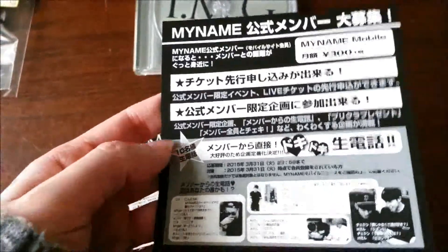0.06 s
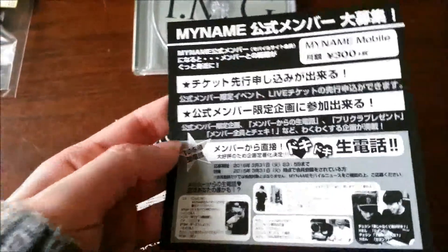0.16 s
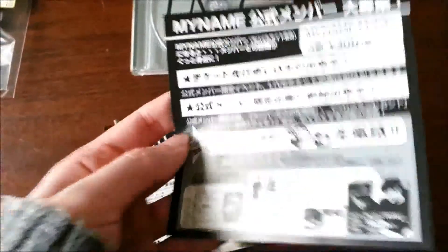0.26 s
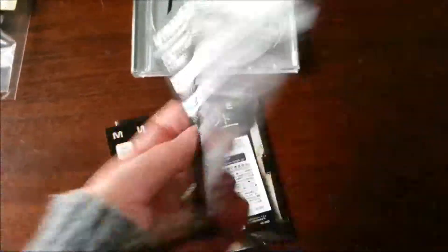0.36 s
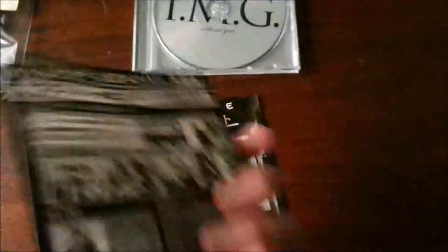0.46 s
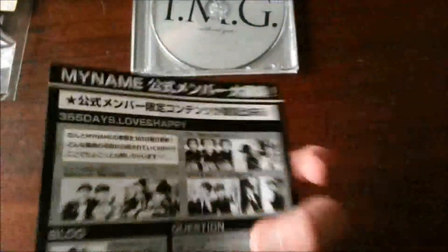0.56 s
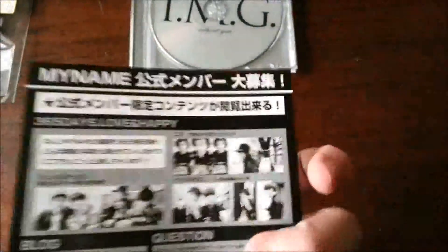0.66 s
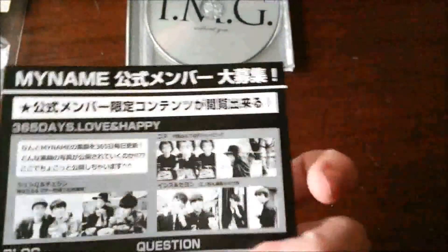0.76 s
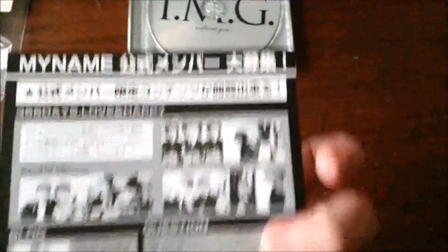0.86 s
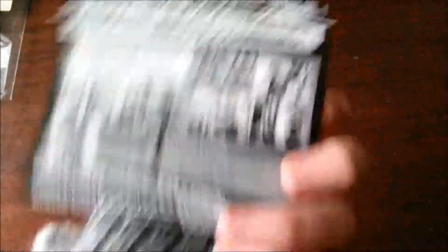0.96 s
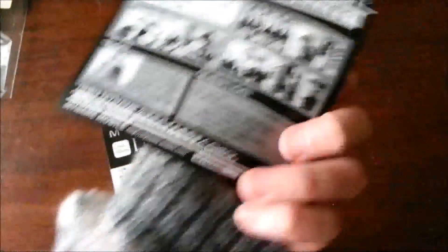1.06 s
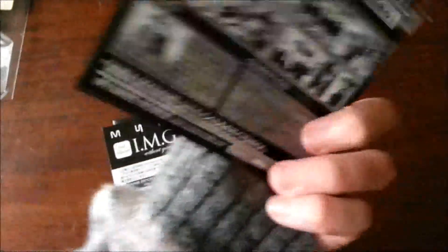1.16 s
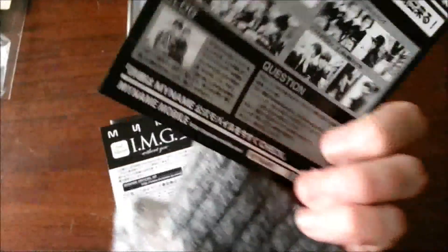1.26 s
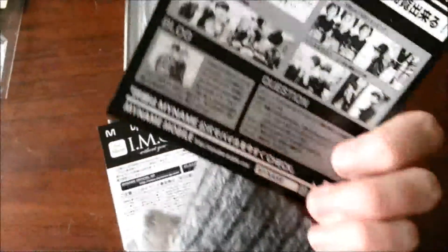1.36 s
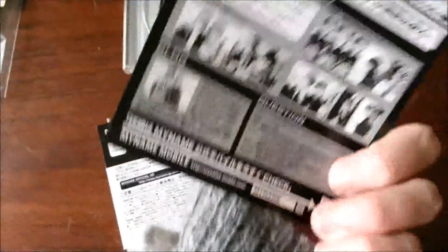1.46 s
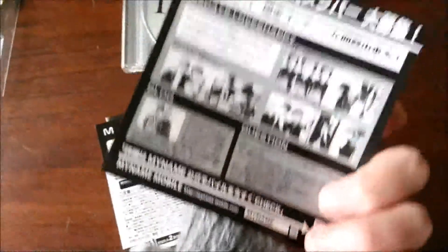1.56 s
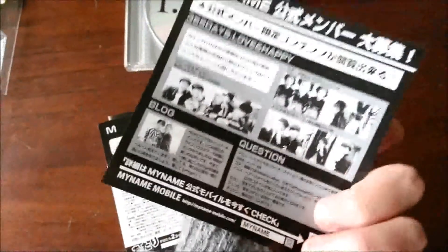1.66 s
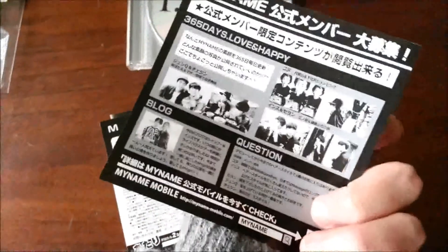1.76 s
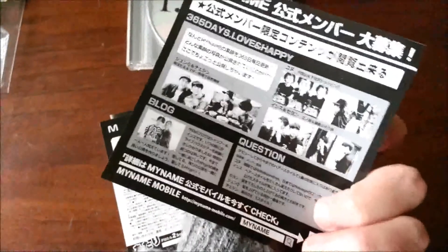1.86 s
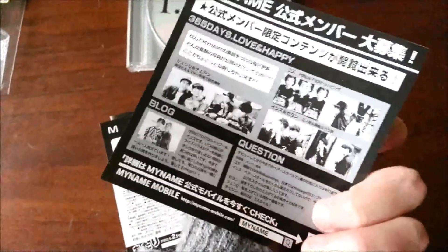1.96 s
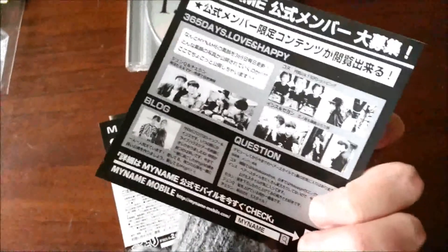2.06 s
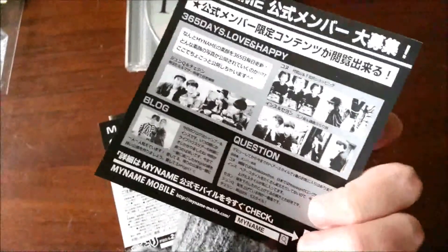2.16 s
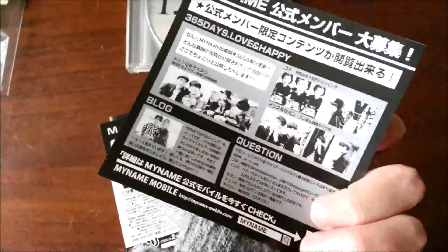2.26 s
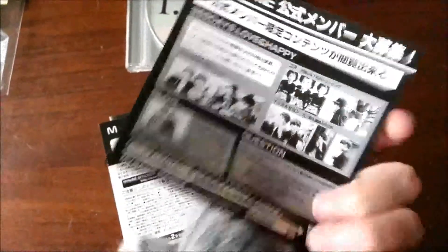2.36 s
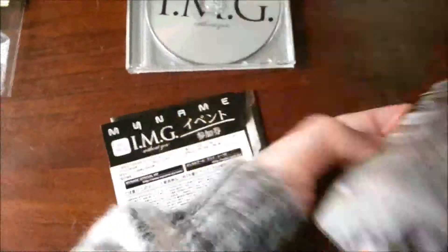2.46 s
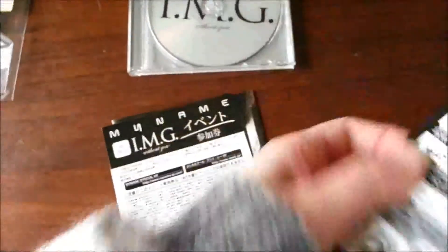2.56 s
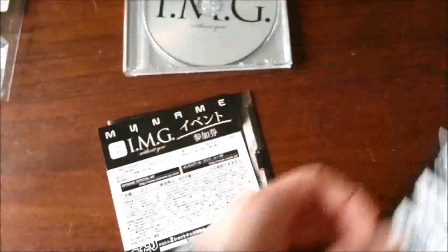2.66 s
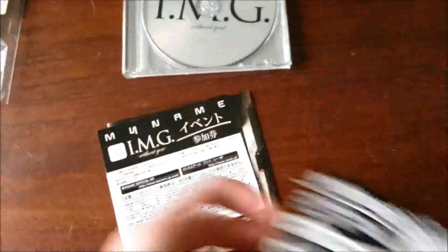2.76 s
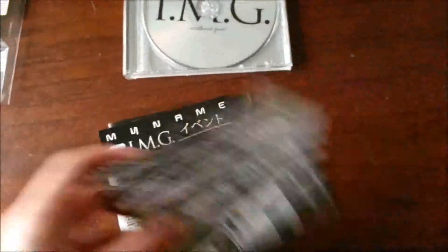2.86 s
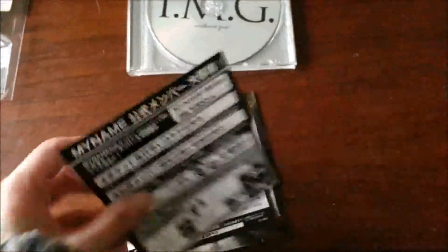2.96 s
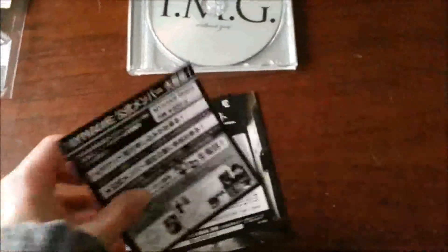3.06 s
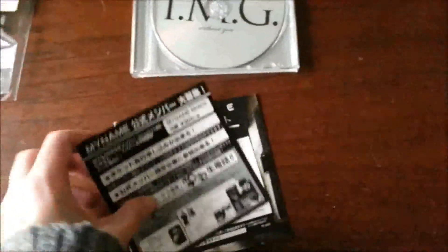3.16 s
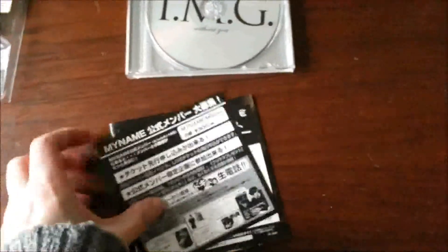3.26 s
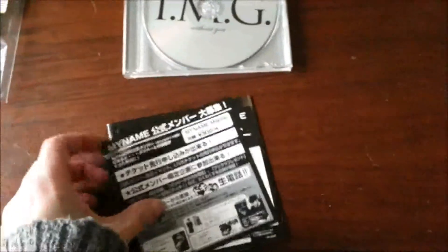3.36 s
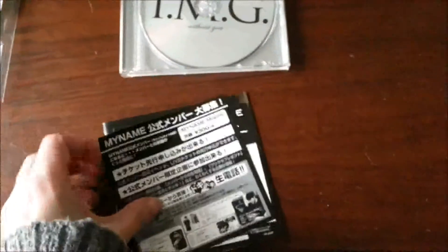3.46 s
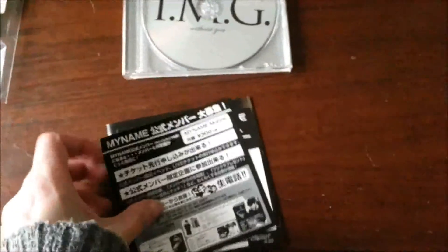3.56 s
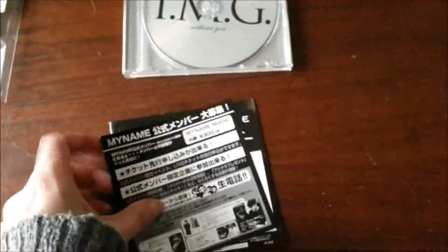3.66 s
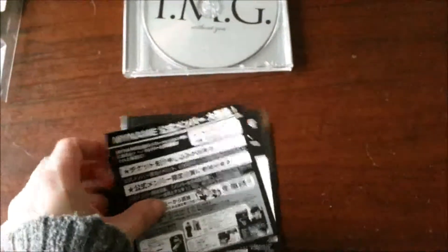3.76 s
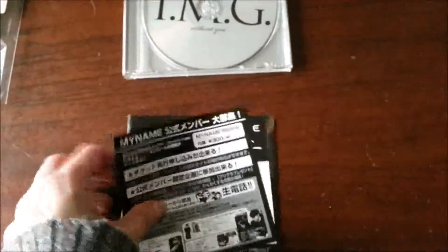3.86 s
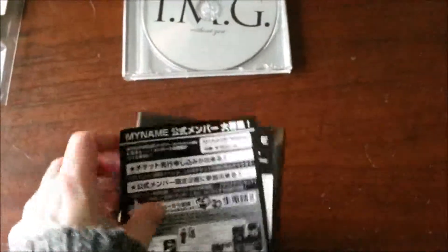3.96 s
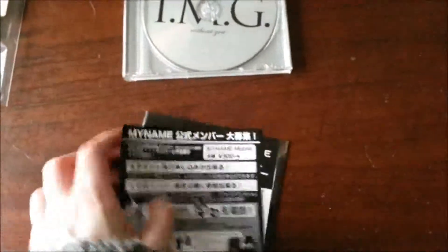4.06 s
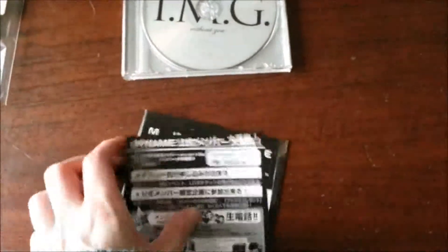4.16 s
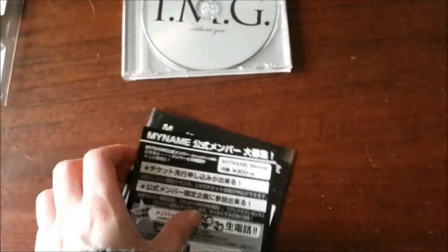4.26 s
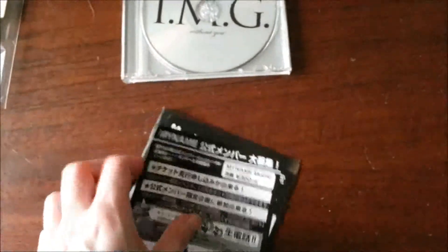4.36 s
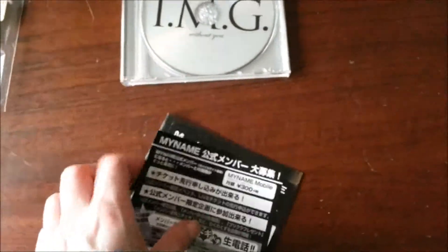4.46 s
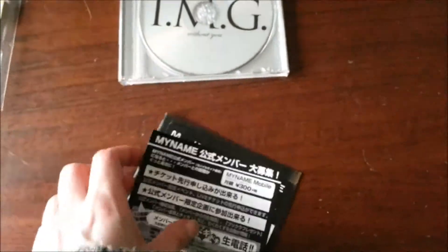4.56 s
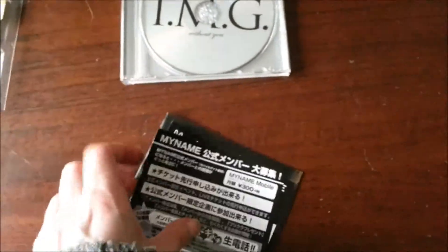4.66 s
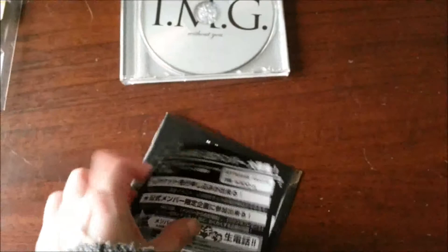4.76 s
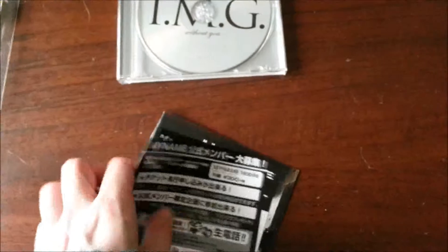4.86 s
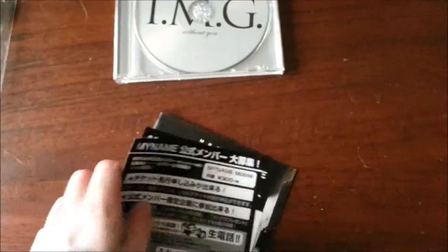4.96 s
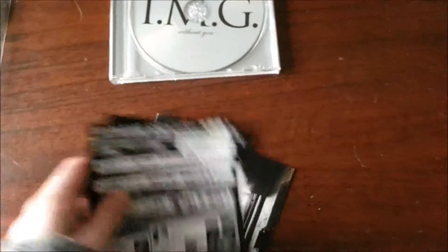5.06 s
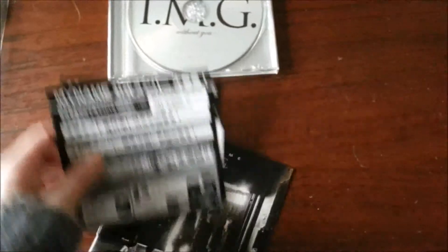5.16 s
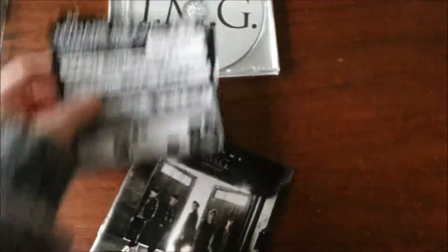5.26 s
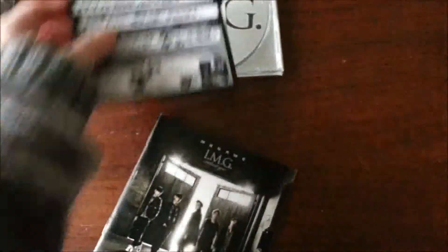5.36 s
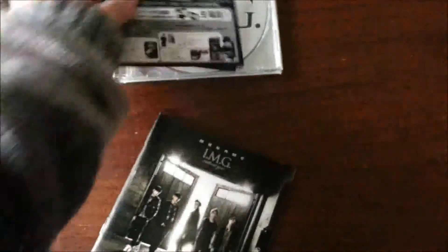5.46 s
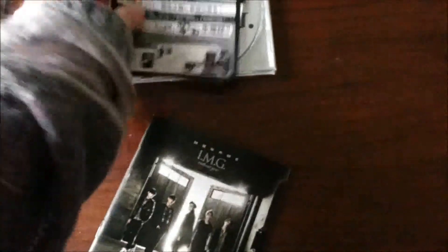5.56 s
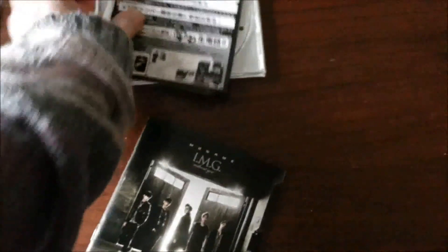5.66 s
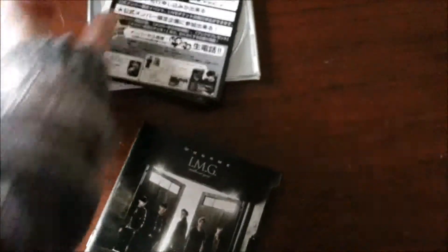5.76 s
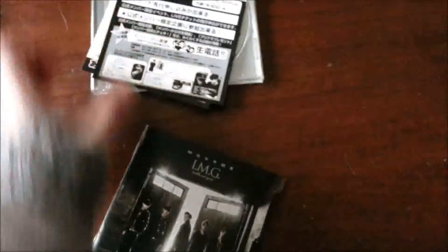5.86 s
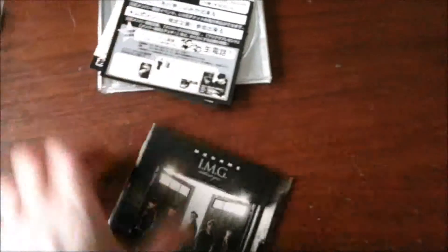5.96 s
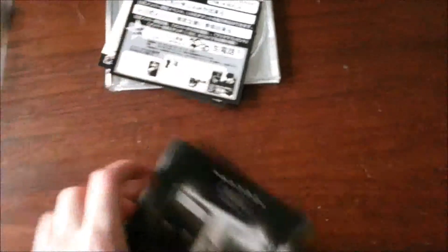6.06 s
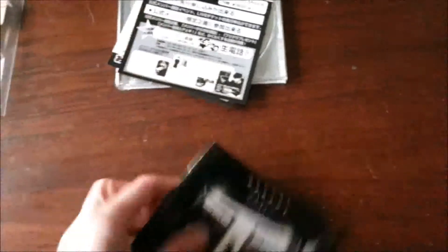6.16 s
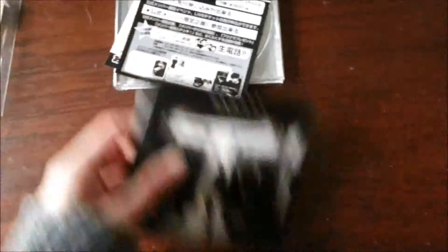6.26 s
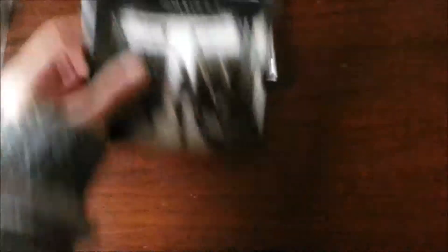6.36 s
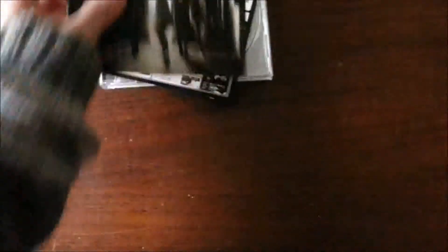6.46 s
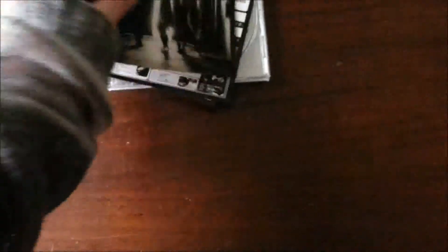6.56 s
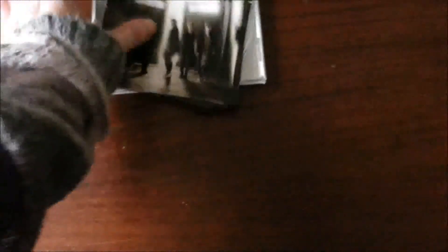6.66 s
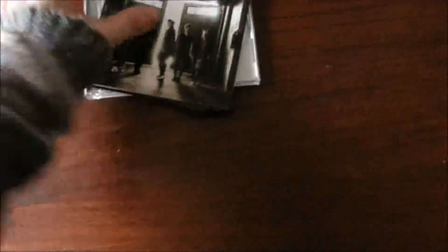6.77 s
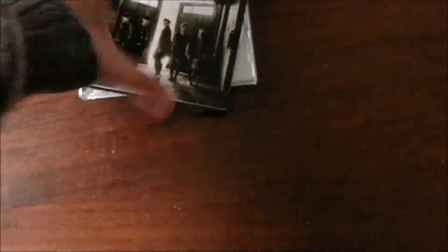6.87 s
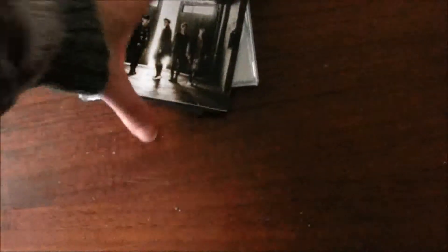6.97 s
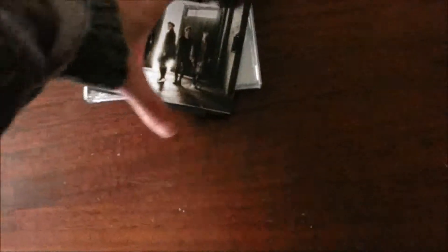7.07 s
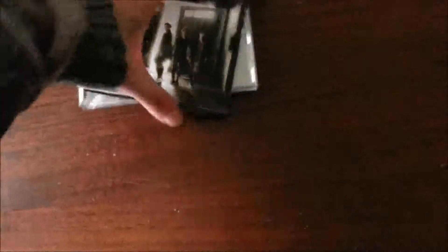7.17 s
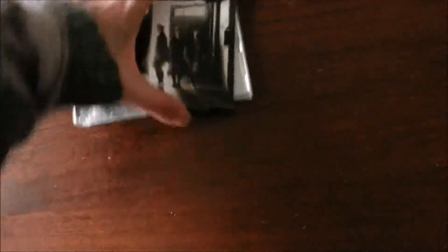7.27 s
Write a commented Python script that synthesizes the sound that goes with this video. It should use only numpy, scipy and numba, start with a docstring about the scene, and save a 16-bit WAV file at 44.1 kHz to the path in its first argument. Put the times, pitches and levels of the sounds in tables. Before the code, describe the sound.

Close dry paper handling: sharp flaps, edge taps and light rustles come in uneven bursts, separated by quiet hiss in a small room.

```python
"""Paper leaflets and a thin booklet turned, flicked and stacked on a wooden table, close under a phone.
Snaps and edge taps are sudden noise bursts, crumples are swells of creases, scuffs are dense tiny clicks;
all of them drive a sheet's flap, bend and edge. A small room rings briefly after them.
Behind lie the hiss of the two microphone ports, as shaped noise, and a far rumble, as narrow wavering noise."""
import sys
import numpy as np
from scipy import signal
from scipy.fft import rfft, irfft, next_fast_len
from scipy.io import wavfile
from scipy.ndimage import uniform_filter1d
from numba import njit

SR = 44100
rng = np.random.default_rng(int(sys.argv[2]) if len(sys.argv) > 2 else 0)


def to_wav(sig):
    """Store sig (one row per channel, or 1-D mono) as 16-bit WAV at the path in sys.argv[1].

    Samples outside -1..1 are clipped; the rate is SR.
    """
    pcm = np.clip(np.atleast_2d(sig), -1, 1) * 32767
    pcm = np.round(pcm).astype(np.int16)
    wavfile.write(sys.argv[1], SR, pcm.T)  # frames by channels


def gain_from_decibels(decibels):
    """Convert decibel values to linear amplitude factors."""
    exponent = np.asarray(decibels, float) / 20
    return 10 ** exponent


N = 322589

# Snaps and taps of single sheets; levels are nominal, before the ports colour them:
# (time [s], bend level [dB], edge tick against bend [dB], sheet pitch [Hz], decay scale [ms])
SNAP_ROWS = [(.0773, -34.5, -19, 3160, 2.6), (.524, -11, 0.5, 2640, 3.2), (.562, -30, 0.5, 2450, 16),
             (.592, -20, -26, 850, 6.3), (.5974, -16, -19, 2310, 6.9), (.624, -12, -15, 2400, 3.5),
             (.6358, -4.5, -8, 3100, 3.1), (.6862, -27.5, -9, 2900, 11), (.7523, -16, -24, 2360, 1.5),
             (.787, -21.5, -22, 3200, 6.1), (.8419, -26.5, -22, 2680, 9.1), (.851, -23, -16, 2520, 2.8),
             (.8693, -29, -20, 3970, 5.5), (.939, -31, -30, 2540, 10), (1.0942, -30, -11, 2280, 8.4),
             (1.1167, -31.5, -15, 2320, 8.2), (1.1344, -29, -18, 736, 2.6), (1.1917, -17, -19, 1070, 3.7),
             (1.2012, -22, -17, 1750, 8.9), (1.208, -19.5, -15, 1520, 7.1), (1.2408, -23.5, -11, 2510, 11),
             (1.2516, -27.5, -12, 2510, 11), (1.3037, -32.5, -22, 690, 21), (1.32, -24, -30, 1000, 4.7),
             (1.7775, -13, -35, 1830, 7.2), (1.779, -19.5, -32, 510, 5.6), (2.5306, -15, -16, 1730, 19),
             (2.5391, -1.5, -12, 1800, 4.1), (2.618, -16, -17, 3600, 2.8), (2.6716, -28, -9, 890, 7.5),
             (2.7015, -23, -12, 2700, 4.3), (2.8142, -33, -15, 1600, 4), (2.8578, -18, -2, 1810, 4.5),
             (2.8615, -17, -28, 800, 3.2), (2.8681, -31, -25, 700, 3.5), (2.8771, -37, -30, 915, 2.4),
             (2.8858, -22, -35, 696, 6.1), (2.9508, -33, -24, 2730, 12), (3.0834, -43, -13, 1340, 9.4),
             (3.151, -25, -11, 2100, 11.5), (3.472, -41, -5, 603, 2.8), (3.5627, -36, 2, 3500, 6.4),
             (3.5705, -12, -34, 2620, 7.8), (3.6973, -40, -15, 1930, 5.6), (3.7871, -29.5, -14, 2430, 4.8),
             (3.7996, -28.5, -8, 3300, 5.4), (3.8316, -21.5, -9, 2470, 3.3), (3.9678, -31, -7, 3000, 9.3),
             (3.9832, -30, -8, 2920, 6.7), (4.236, -37, -6, 5000, 3.7), (4.4554, -33, -24, 2470, 11),
             (4.4741, -21, -16, 2260, 2.5), (4.4906, -17, -7, 2200, 5), (4.4984, -16, -22, 3630, 4.9),
             (4.6722, -24, -11, 2270, 3), (4.8433, -24.5, -13, 2430, 5.8), (4.875, -28, -19, 3060, 23),
             (4.8975, -7.5, -0.5, 4960, 2.9), (4.9075, -13, -2.5, 4950, 15), (4.9163, -7, -31, 4830, 3.6),
             (4.923, -9.5, -28, 2900, 3.8), (5.0013, -8.5, -15, 1960, 2.7), (5.0046, -2.5, -6.5, 3400, 3.8),
             (5.192, -37, 1.5, 1820, 12), (5.641, -38, -14, 2500, 3), (5.6989, -23, -5, 1390, 13.8),
             (5.773, -23, -10, 2800, 14), (6.1355, -21.5, 0.5, 2140, 3.8), (6.148, -30, -25, 596, 4.1),
             (6.1734, -39, -6, 870, 5.5), (6.654, -33.5, -7.5, 3630, 6.2), (6.7108, -29, -10, 1210, 8.8),
             (6.804, -8.5, -4, 1195, 11.1), (6.8483, -23.5, -16, 1010, 3.1)]
# Soft crumples and bumps; length lies between the points 6 dB down:
# (middle time [s], bend level [dB], edge crackle against bend [dB], sheet pitch [Hz], length [ms])
CRUMPLE_ROWS = [(.477, -43.5, -14, 1900, 42), (.55, -34, -7, 2300, 48), (.606, -29, -16, 2360, 39),
                (.632, -28, -5, 3070, 20), (.687, -33.5, -24, 2420, 9.8), (.756, -46, -2, 2340, 26),
                (.78, -36.5, -10, 2740, 14.4), (.857, -39, -31, 2570, 29), (.894, -43, -2, 2500, 22),
                (.934, -45.5, -8, 2500, 18.5), (1.156, -47, -19, 700, 47), (1.208, -31.5, -14, 2030, 42),
                (1.248, -36, -9, 2550, 18), (1.32, -36, -28, 1170, 21.9), (2.485, -46.5, -8, 2800, 56),
                (2.525, -35.5, -12, 1600, 15.3), (2.565, -40.5, -6, 765, 29), (2.675, -36.5, 4, 2200, 25),
                (2.702, -27.5, -13, 2580, 15.5), (2.82, -47, -20, 1570, 25), (2.872, -35.5, -32, 720, 18.5),
                (2.892, -42.5, -25, 680, 43), (3.004, -44, -38, 1230, 71), (3.086, -46, -20, 1000, 17.5),
                (3.162, -47.5, -11, 2230, 26), (3.23, -47, -7, 1380, 29), (3.346, -47, -33, 1970, 23),
                (3.533, -51, -11, 3520, 18), (3.828, -52, -10, 2000, 19), (3.934, -55, -8, 3160, 25),
                (4.084, -58, -15, 3750, 64), (4.47, -39, 0, 2270, 34), (4.497, -35, -3.5, 3740, 26),
                (4.649, -52.5, -25, 2050, 56), (4.9, -28.5, -5.5, 2980, 27), (4.934, -33, -16, 2940, 14),
                (4.98, -36.5, -4.5, 3270, 36), (5.186, -48, -17, 1850, 22), (5.782, -40.5, -22, 1670, 27),
                (6.171, -61, -26, 1240, 56), (6.24, -46.5, 1.5, 2400, 40), (6.3, -52.5, -2, 1850, 45),
                (6.722, -56, 2, 1180, 42), (6.824, -32.5, -9, 3020, 58), (7.31, -43.5, -29, 3300, 27)]
# Sheets sliding, one curve for each bout of handling: (time [s], drag level [dB], sheet pitch [Hz])
SLIDE_BOUTS = [
    [(0.4, -62, 2130), (0.482, -53, 2380), (0.588, -37.5, 2340), (0.646, -70, 3200), (0.714, -72, 2450),
     (0.786, -49, 2750), (0.892, -59, 2500), (1.0, -65, 2290)],
    [(1.05, -54, 2350), (1.118, -50.5, 2260), (1.144, -57, 1710), (1.27, -56, 2680), (1.294, -58, 1140),
     (1.358, -51, 1220), (1.46, -64, 1660), (1.5, -62, 1630)],
    [(2.43, -65, 1920), (2.45, -67, 2440), (2.576, -46, 1930), (2.622, -43, 3350), (2.648, -42, 2520),
     (2.748, -52, 2600), (2.808, -49.5, 1760), (2.84, -44, 1850)],
    [(2.9, -61, 971), (2.95, -46, 1350), (3.104, -57.5, 1320), (3.124, -59, 2220), (3.188, -49, 2240),
     (3.222, -55, 1380), (3.388, -49, 2500), (3.45, -64, 2020)],
    [(3.5, -51, 2310), (3.508, -58, 2510), (3.762, -51.5, 2550), (4.034, -54, 2830), (4.06, -50, 3100),
     (4.216, -56, 2220), (4.268, -71, 1610), (4.3, -68, 1680)],
    [(4.35, -50.5, 1960), (4.39, -60, 2500), (4.442, -51, 2240), (4.53, -56, 2920), (4.572, -51.5, 2240),
     (4.654, -57, 2200), (4.7, -63, 2260), (4.75, -67, 1770)],
    [(4.8, -68, 2430), (4.894, -40, 2930), (5.022, -57, 3260), (5.11, -55, 2800), (5.176, -49.5, 1820),
     (5.27, -57, 2410), (5.348, -68, 1590), (5.4, -72, 1760)],
    [(5.62, -56, 1710), (5.662, -59, 1470), (5.724, -51, 1570), (5.752, -45, 2780), (5.844, -53.5, 2570),
     (5.876, -70, 1940), (5.902, -67, 2010), (5.95, -62, 1400)],
    [(6.12, -69, 2130), (6.16, -48, 2160), (6.204, -47, 2620), (6.248, -59, 2600), (6.318, -48, 1890),
     (6.384, -55.5, 2680), (6.428, -72, 1680), (6.45, -65, 1730)],
    [(6.62, -73, 3010), (6.656, -61, 3420), (6.692, -59.5, 1320), (6.828, -51, 1330), (6.87, -47, 1550),
     (6.9, -47, 1420), (7.018, -61, 1540), (7.05, -69, 1305)],
]
# Room tail before it is scaled as a whole: (frequency [Hz], 60 dB decay time [s], level [dB])
ROOM_DECAY = [(200, 0.45, -0.5), (1000, 0.33, 1.5), (4000, 0.38, -8.5), (12200, 0.37, 3.5)]
# Where the hands are, heard in the treble: (time [s], left minus right [dB])
HAND_SIDE = [(0, -17), (.3, 2), (.63, -0.5), (2.4, 2), (2.8, 7.5), (3.1, 3.5), (4.4, -0.5), (4.6, 7),
             (5.1, 1.5), (5.74, 0.5), (6.33, 3), (6.5, -14), (6.8, 7.5), (7.31, 2)]
# How each microphone port rings: (frequency [Hz], gain [dB])
LEFT_PORT_RING = [(100, 5), (400, 1.5), (1200, 0), (1700, -4.5), (2450, 0.5), (2950, -8), (3500, 1),
                  (4600, 2), (5700, 6), (6300, 3), (7100, 0.5), (10000, 5.5), (14000, -3.5), (16000, -23)]
RIGHT_PORT_RING = [(100, 5.5), (400, 0), (1200, 3.5), (1700, -1), (2450, 3.5), (3200, 1.5), (4200, -1.5),
                   (4900, -6.5), (6000, -24), (8000, -3), (11000, -2.5), (14000, -5.5), (16000, -28)]
# Spectrum of the port hiss before it is scaled as a whole: (frequency [Hz], density [dB per Hz])
HISS_SPECTRUM = [(15, -57), (25, -27), (87, -9.5), (189, -3.5), (228, -3.5), (322, -7), (480, -10.5),
                 (520, -12), (735, -15.5), (818, -13.5), (2020, -18.5), (2570, -18.5), (4620, -23.5),
                 (6350, -28), (14500, -23)]
# Far rumble: (time [s], level [dB])
RUMBLE_LEVEL = [(0.0, -63), (0.41, -69), (0.61, -63), (1.4, -62.5), (2.52, -70), (2.67, -65.5), (4.89, -69),
                (5.13, -70), (5.44, -56), (6.07, -54), (6.25, -59.5), (6.45, -67), (6.74, -57), (7.31, -64)]

# A looser sheet bends at a lower pitch and flaps more
TAUT_HZ, FLAP_DB_PER_OCTAVE_DOWN = 2500, 7.5
# flap against bend at the taut pitch
SNAP_FLAP_DB, CRUMPLE_FLAP_DB, SLIDE_FLAP_DB = -18.5, -11.5, -10
# small snaps inside each crumple: count, then level and edge tick against the crumple's own
CREASES, CREASE_DB, CREASE_SCATTER_DB, CREASE_EDGE_DB, CREASE_MS = 3, 5.5, 2, -15, 8.8
# nominal hiss of the rubbing face at a drag of -50 dB; dB per dB of drag
FACE_DB, FACE_FOLLOWS = -54.5, 0.77
ROOM_DB, HISS_DB = -11, -55.5
PORT_LAG_MS = 0.13
HISS_TOP_HZ, TOP_HZ = 14600, 15900
T = np.arange(N) / SR
EDGE = signal.butter(3, 4600, "high", fs=SR, output="sos")


def unit(x):
    """Scale to rms 1."""
    return x / np.sqrt(np.mean(x ** 2))


def on_log(hz, table):
    """Read a (frequency [Hz], value) table on a log frequency axis."""
    table_hz, value = np.transpose(table)
    return np.interp(np.log(np.maximum(hz, 1)), np.log(table_hz), value)


def walk(rate):
    """Random levels, rate per second, joined by straight slopes; rms 1."""
    hold = int(SR / rate)
    steps = np.repeat(rng.standard_normal(N // hold + 1), hold)
    return unit(uniform_filter1d(steps, hold)[:N])


@njit
def moving_band(x, hz, share):
    """State-variable band-pass whose centre may move; width is a share of the centre."""
    y, band, low = np.empty(len(x)), 0., 0.
    for i in range(len(x)):
        g = np.tan(np.pi * hz[i] / SR)
        v = (band + g * (x[i] - low)) / (1 + g * (g + share))
        band, low, y[i] = 2 * v - band, low + 2 * g * v, share * v
    return y


def sheet(push, hz, width):
    """A pushed sheet answers with a low flap, a bending resonance at its pitch and a bright edge; each rms 1."""
    flap = moving_band(moving_band(push, 520 + 0 * hz, 1.16), 700 + 0 * hz, 1.25)
    above = np.sqrt(hz * 2200)
    bend = moving_band(moving_band(push, hz, width), hz, 1.0)
    bend = bend + gain_from_decibels(-6.5) * moving_band(moving_band(push, above, 1.26), above, 1.26)
    edge = signal.sosfilt(EDGE, push)
    return unit(flap), unit(bend), unit(edge)


def looseness(hz):
    """Extra flap in dB of a sheet that bends below the taut pitch (less flap above it)."""
    return FLAP_DB_PER_OCTAVE_DOWN * np.log2(TAUT_HZ / hz)


def push_sheet(out, start, noise, shapes, levels_db, pitch_hz):
    """Push a sheet with noise under one envelope per part; each part gets the energy its envelope promises."""
    hz = np.full(len(noise), np.clip(pitch_hz, 500., 7000.))
    for part, (shape, db) in enumerate(zip(shapes, levels_db)):
        answer = sheet(noise * shape, hz, 0.3)[part]
        out[start:start + len(noise)] += answer * gain_from_decibels(db) * np.sqrt(np.mean(shape ** 2))


def snaps(rows):
    """Each snap is a sudden ragged burst; the flap dies later than the bend and the edge tick."""
    out, size = np.zeros(N + 8192), 1536
    t = np.arange(size) / SR
    rise = 1 - np.exp(-t / 0.00022)
    bursts = rng.standard_normal((len(rows), size))
    for (s, db, tick_db, pitch_hz, ms), noise in zip(rows, bursts):
        decay_s = max(ms, .5) / 1000
        # flap, bend, edge: each falls 20 dB in its multiple of the decay scale
        shapes = [rise * gain_from_decibels(-20 * t / (slow * decay_s)) for slow in (1.7, .7, .5)]
        levels_db = db + np.array([SNAP_FLAP_DB + looseness(pitch_hz), 0, tick_db])
        push_sheet(out, int((s - .0011) * SR), noise, shapes, levels_db, pitch_hz)
    return out[:N]


def creases():
    """A few small snaps at random moments inside each crumple, as rows like SNAP_ROWS."""
    chance = rng.standard_normal((len(CRUMPLE_ROWS), CREASES, 3))
    rows = []
    for (s, db, edge_db, hz, ms), draws in zip(CRUMPLE_ROWS, chance):
        for when, strength, pitch in draws:
            moment = max(s + ms / 2000 * np.tanh(when), .01)
            level_db = db + CREASE_DB + CREASE_SCATTER_DB * strength
            rows.append((moment, level_db, edge_db + CREASE_EDGE_DB, hz * (1 + 0.14 * pitch), CREASE_MS))
    return rows


def crumples():
    """A swell of many small creases giving way: uneven clicks about a millisecond long, loudest mid-swell."""
    out, size = np.zeros(N + 8192), 6144
    t = (np.arange(size) - size // 2) / SR
    chance = rng.standard_normal((len(CRUMPLE_ROWS), 2, size))
    for (s, db, edge_db, pitch_hz, ms), (noise, crease) in zip(CRUMPLE_ROWS, chance):
        grain = noise * gain_from_decibels(2.55 * unit(uniform_filter1d(crease, size=44)))
        swell = gain_from_decibels(-6 * np.abs(2000 * t / max(ms, 4)) ** 4.0)
        levels_db = db + np.array([CRUMPLE_FLAP_DB + looseness(pitch_hz), 0, edge_db])
        push_sheet(out, int(s * SR) - size // 2, grain, [swell] * 3, levels_db, pitch_hz)
    return out[:N]


def slides():
    """Fibres catch and let go in dense tiny clicks that stutter as the sheets drag;
    the whole rubbing face hisses more evenly and reaches each port from other spots."""
    bouts = []
    for bout in SLIDE_BOUTS:
        # each bout fades from and to near silence in 30 ms
        before = (bout[0][0] - .03, -95, bout[0][2])
        after = (bout[-1][0] + .03, -95, bout[-1][2])
        bouts.append([before] + list(bout) + [after])
    rows = np.concatenate(bouts)
    rows = rows[np.argsort(rows[:, 0])]
    drag_db, hz = (np.interp(T, rows[:, 0], column) for column in rows[:, 1:].T)
    stutter_db = 1.5 * walk(70) + 1.14 * walk(400) + 2.0 * walk(11)

    click_size = gain_from_decibels(1.97 * rng.exponential(size=N))
    clicks = unit(rng.standard_normal(N) * click_size * (rng.random(N) < .15))
    push = clicks + 0.66 * rng.standard_normal(N)
    wandering_hz = np.clip(hz * (1 + 0.26 * walk(30)), 500, 7000)
    flap, bend, edge = sheet(push, wandering_hz, 0.53)
    scuff = gain_from_decibels(drag_db + stutter_db) * (gain_from_decibels(SLIDE_FLAP_DB + looseness(hz)) * flap + bend)

    face = .5 * edge + unit(signal.sosfilt(EDGE, rng.standard_normal((2, N))))
    face = signal.sosfilt(signal.ellip(8, .2, 60, HISS_TOP_HZ, fs=SR, output="sos"), face)
    face_db = FACE_DB + FACE_FOLLOWS * (drag_db + 50) + 0.87 * stutter_db
    return scuff, gain_from_decibels(face_db) * face


def room(x):
    """A decaying noise tail per octave; the ports share most of its bass and differ in the treble."""
    t = np.arange(SR // 2) / SR
    tail = 0
    for hz in 150 * 2. ** np.arange(7):
        octave = signal.butter(2, [hz / 2 ** .5, hz * 2 ** .5], "band", fs=SR, output="sos")
        t60, db = (on_log(hz, np.array(ROOM_DECAY)[:, [0, k]]) for k in (1, 2))
        mid, side = signal.sosfilt(octave, rng.standard_normal((2, len(t)))) * gain_from_decibels(db - 60 * t / t60)
        tail = tail + mid + min(hz / 1100, 1) * side * np.array([[1], [-1]])
    tail = tail * np.clip(t / 0.0063, 0, 1) ** 2  # the tail builds up over 6.3 ms
    tail = tail / np.sqrt(np.sum(tail ** 2, axis=1, keepdims=True))
    return gain_from_decibels(ROOM_DB) * signal.fftconvolve(x[None], tail, axes=1)[:, :N]


def causal(x, table, size=2048):
    """Colour by a (frequency [Hz], gain [dB]) table with the causal response from its cepstrum."""
    cepstrum = irfft(np.log(gain_from_decibels(on_log(np.fft.rfftfreq(size, 1 / SR), table))))
    cepstrum[1:size // 2] *= 2
    cepstrum[size // 2 + 1:] = 0
    return signal.fftconvolve(x, irfft(np.exp(rfft(cepstrum))))[:len(x)]


def ports(near, far):
    """Each port rings in its own way; the left one hears a little late, and the phone's body shades the treble."""
    shade_db = np.interp(T, *np.transpose(HAND_SIDE)) / 2
    late = np.interp(T - PORT_LAG_MS / 1000, T, near)
    out = []
    for direct, tail, ring, way in ((late, far[0], LEFT_PORT_RING, 1), (near, far[1], RIGHT_PORT_RING, -1)):
        bass = signal.lfilter(*signal.butter(1, 1100, fs=SR), direct)
        shaded = bass + (direct - bass) * gain_from_decibels(way * shade_db)
        out.append(causal(shaded + tail, ring))
    return np.array(out)


def port_hiss():
    """Each port hisses alone; only the room's bass is partly shared."""
    size = next_fast_len(N)
    hz = np.fft.rfftfreq(size, 1 / SR)
    colour = gain_from_decibels(on_log(hz, HISS_SPECTRUM)) * (hz < HISS_TOP_HZ)
    mid, side = (rfft(rng.standard_normal(size)) * colour for _ in range(2))
    side = side * np.clip((hz / 600) ** 0.24, 0, 1)
    pair = irfft([mid + side, mid - side], size)[:, :N]
    return gain_from_decibels(HISS_DB) * pair / np.sqrt(np.mean(pair.mean(0) ** 2))


def rumble():
    """A far low drone near one room mode, as narrow noise, swells and wavers."""
    hz = 190 * (1 + 0.051 * walk(4))
    mid, side = (unit(moving_band(moving_band(rng.standard_normal(N), hz, 0.099), hz, 0.39)) for _ in range(2))
    level = gain_from_decibels(np.interp(T, *np.transpose(RUMBLE_LEVEL)))
    return level * (mid + 0.15 * side * np.array([[1], [-1]]))


def scene():
    """Paper close to the ports, its room tail, hiss and rumble."""
    scuff, face = slides()
    paper = snaps(SNAP_ROWS) + snaps(creases()) + crumples() + scuff
    return ports(paper, room(paper) + face) + port_hiss() + rumble()


def top_cut(x):
    """Nothing passes above the cut-off."""
    return signal.sosfilt(signal.butter(12, 15810, fs=SR, output="sos"), x)


def record(dry):
    """The phone cuts the top of what its two ports hear with a steep low-pass."""
    low_pass = signal.ellip(8, .2, 70, TOP_HZ, fs=SR, output="sos")
    mix = signal.sosfilt(low_pass, dry)
    return top_cut(mix)


dry = scene()
out = record(dry)
to_wav(out)
```